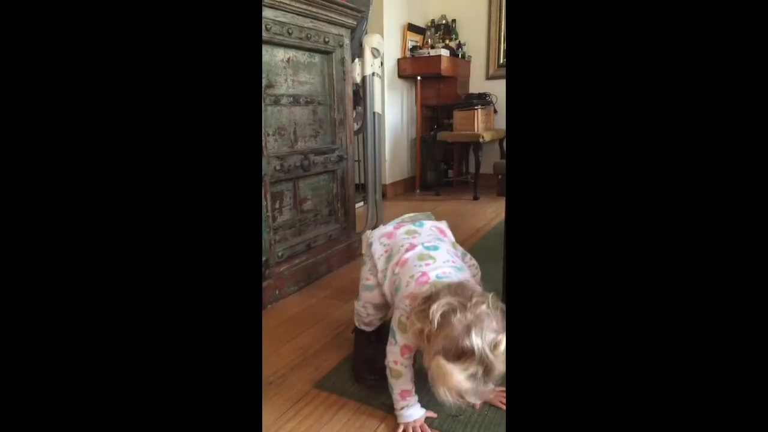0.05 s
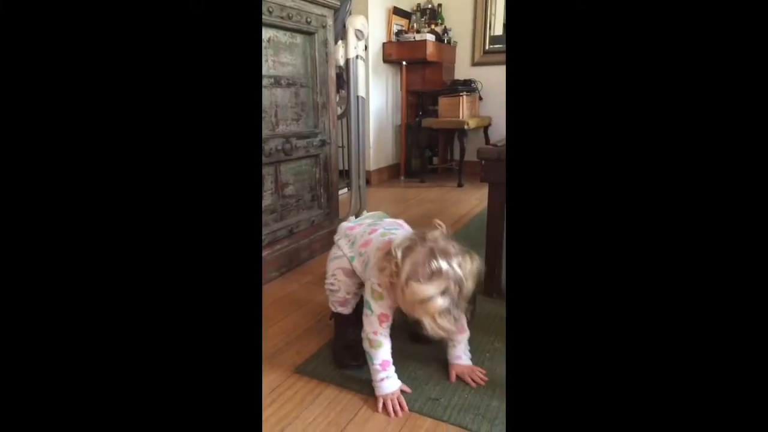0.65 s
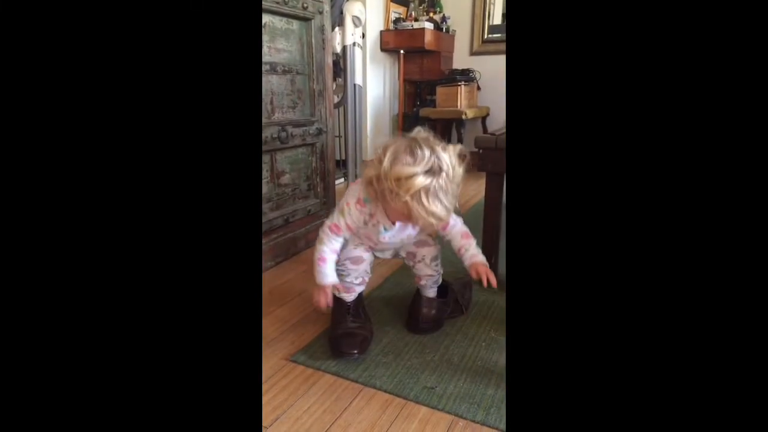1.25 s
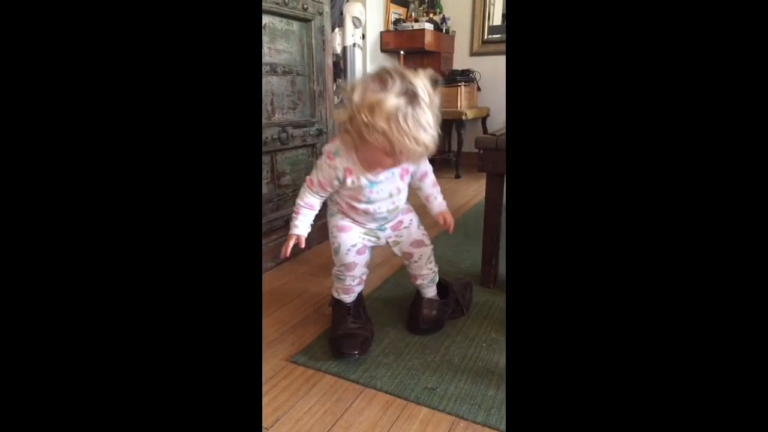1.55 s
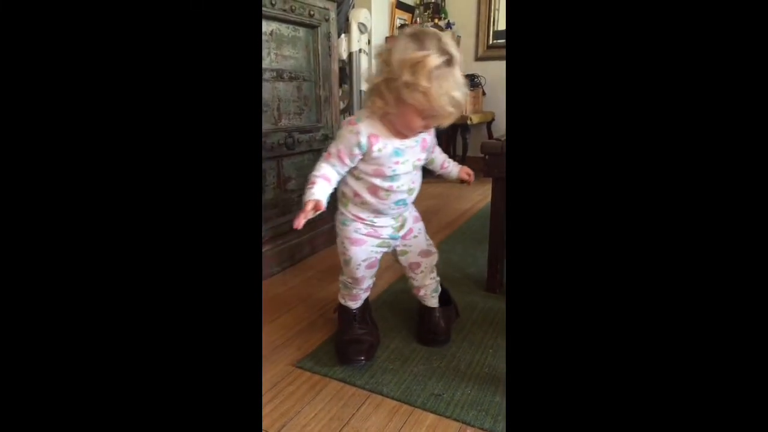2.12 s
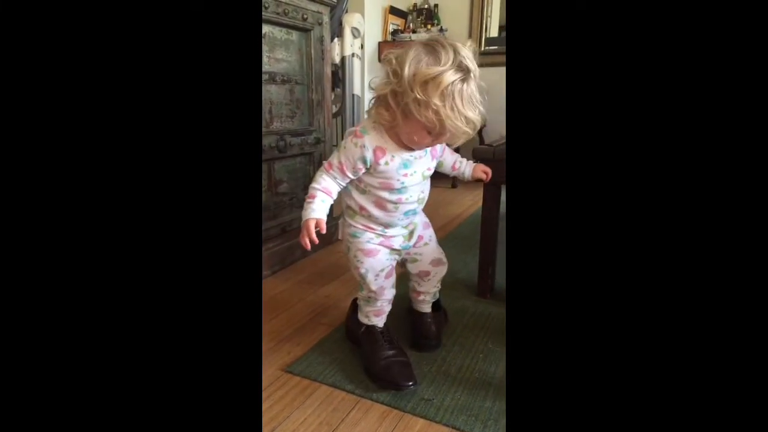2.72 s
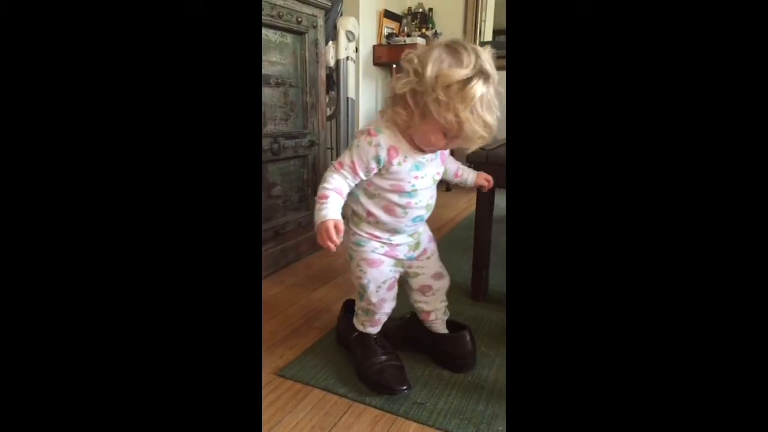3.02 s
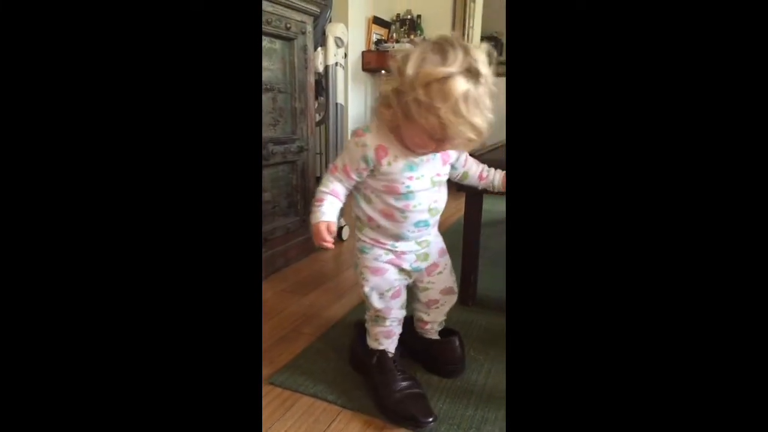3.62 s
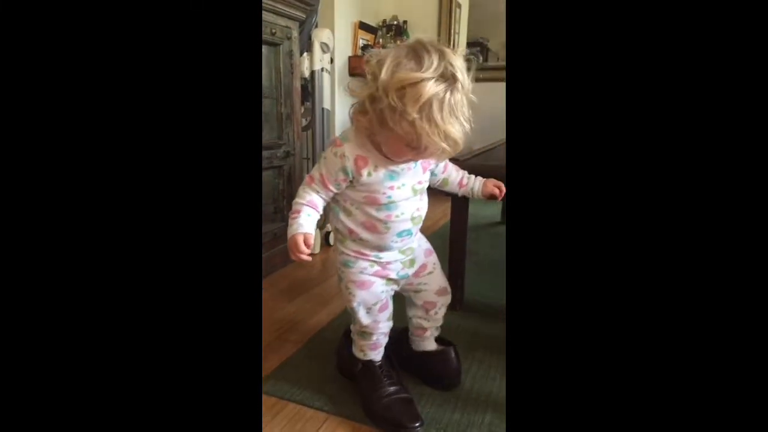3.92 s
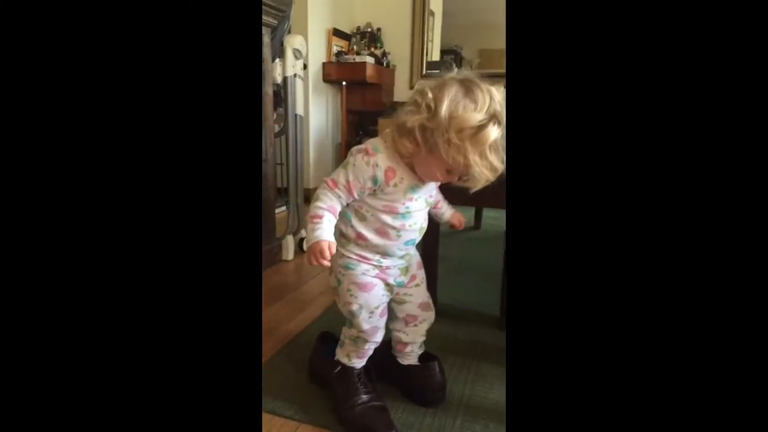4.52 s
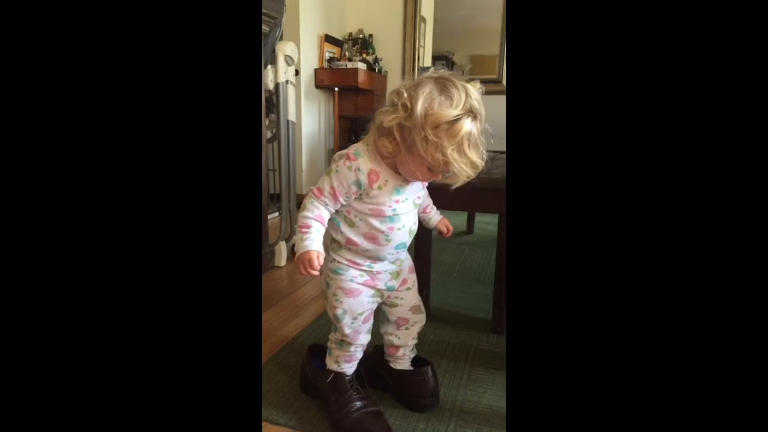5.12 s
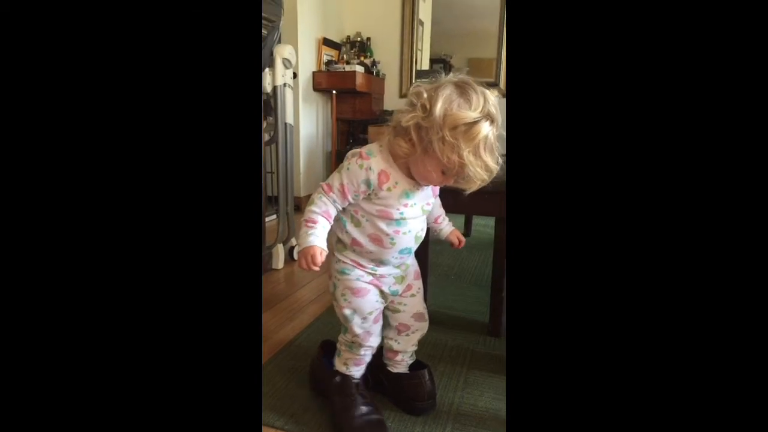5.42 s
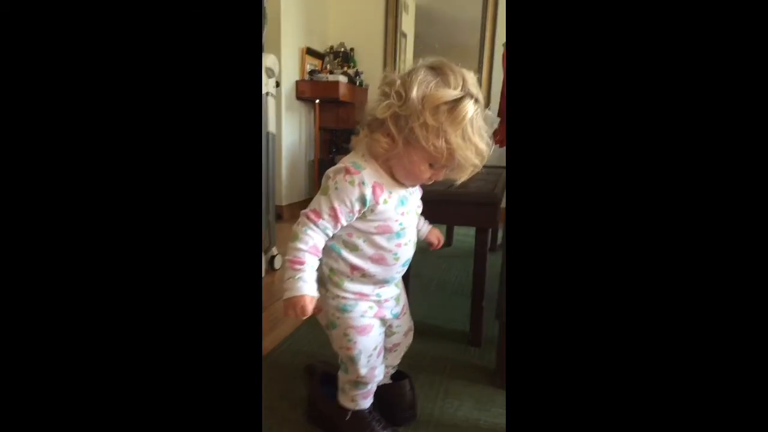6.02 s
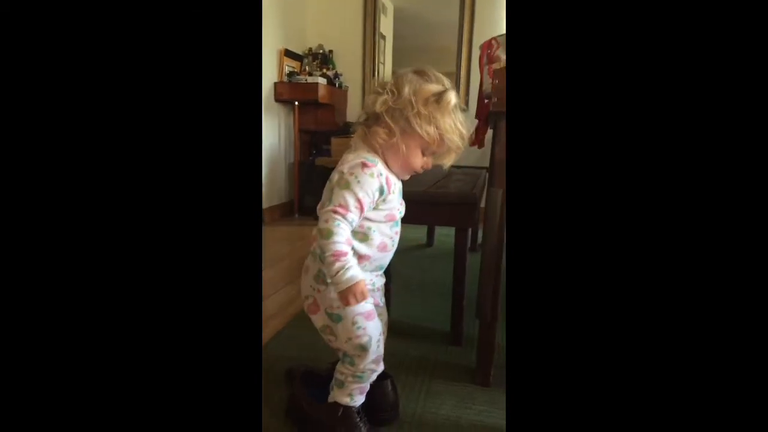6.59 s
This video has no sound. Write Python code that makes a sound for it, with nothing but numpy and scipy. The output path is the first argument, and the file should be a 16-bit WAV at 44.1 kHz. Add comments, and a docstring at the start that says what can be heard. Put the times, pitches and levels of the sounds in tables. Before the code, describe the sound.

In a quiet room, a toddler shuffles in oversized leather shoes on a rug over wooden boards. Faint rustling and scuffing lead to a soft thud, then two louder hollow steps, the second with a heel clack and a boom from the floor. Light scuffs and a softer step follow, and something hard is bumped at the end. The microphone is nearby, with low air noise underneath.

```python
"""A quiet room with a rug over a wooden floor: a toddler stands up and shuffles in large leather shoes.
Each footfall is an impact that excites damped modes: the boards boom, the hollow shoe knocks, the heel
clacks. Between steps, stick-slip friction makes the soles scuff over the pile and the pyjamas rustle.
Leather creases tick, a faint tone follows the last heavy step, and at the end something hard is bumped
and rings. Impacts and rubbing reverberate over steady air noise."""
import sys
import numpy as np
from scipy import signal
from scipy.fft import rfft, irfft
from scipy.io import wavfile
from scipy.ndimage import uniform_filter1d

SR = 44100
rng = np.random.default_rng(int(sys.argv[2]) if len(sys.argv) > 2 else 0)


def wav_record(signal):
    """Record a signal, one row per channel, as 16-bit PCM in the file named by sys.argv[1]."""
    frames = np.transpose(np.atleast_2d(signal))
    bounded = np.clip(frames, -1, 1)
    # unit amplitude maps onto the largest positive 16-bit level
    quanta = np.round(bounded * 32767).astype(np.int16)
    wavfile.write(sys.argv[1], SR, quanta)


N = 297675

# Footfalls: (time [s], hollow knock [dB], heel clack [dB], leather tick [dB], shoe pitch [ratio],
# wait until the weight lands [s], floor boom [dB], skid [dB], skid hold [s], skid resonance [Hz])
STEPS = [ (0.013, -49, -45, -48.5, 1.11, 0.0064, -65, -61, 0.0043, 1210),
         (2.4182, -44, -56, -33, 0.93, .004, -34, -59.5, .04, 3230),
         (2.9500, -17, -48, -28.5, 1.033, 0.054, -34, -57, 0.019, 3560),
         (3.4753, -15, -16, -27, 0.97, 0.003895, -23.5, -54.5, 0.019, 1780),
         (5.4859, -37, -51, -51, 1.03, 0.00273, -50.5, -61.5, 0.012, 716),
         (5.553, -67, -61, -64, 0.79, .002, -40, -56, 0.025, 3600), ]
# Nudges of a shoe that stays on the rug: (time [s], hollow knock [dB], floor boom [dB])
NUDGES = [(1.004, -54.5, -67), (1.784, -57, -65), (2.2735, -51, -78), (2.555, -54, -47.5),
          (2.741, -51, -84), (3.886, -48, -58), (4.007, -48.5, -53.5), (4.076, -51, -72), (4.618, -63, -49),
          (5.239, -52.5, -69), (5.357, -51, -75), (5.52, -45, -71), (5.584, -67, -40), (5.761, -59, -51.5),
          (6.014, -54.5, -62), (6.194, -52.5, -57), (6.298, -69, -52), (6.601, -46.5, -50)]
# Modes of the floorboards: (frequency [Hz], level [dB], T60 [s])
BOARD_MODES = [(49.83, -12, 0.23), (69.8, -15.5, 0.65), (96.5, 5, 0.055), (107.8, -3, 0.12),
               (118.8, -6.5, 0.12), (177.3, -3.5, 0.034), (179, 1.5, 0.059), (222, -23, 0.32)]
def footfalls(rebound_s=.014, rock_s=.078, dulling_db_per_s=371):
    """Impact excitation: a shoe strikes and rebounds, the weight drives the boards, the shoe rocks."""
    out, boom = np.zeros(N), struck(BOARD_MODES, contact_s=.0053)
    light_touches = list(NUDGES)
    for s, knock_db, clack_db, tick_db, pitch, wait, boom_db, *_ in STEPS:
        add(out, s, shoe(knock_db, clack_db, tick_db, pitch))
        # the sole slaps flat under the weight, duller the later it lands
        lands = s + wait
        edge_db = -4.5 - dulling_db_per_s * wait
        add(out, lands, shoe(boom_db - 6, clack_db + edge_db, tick_db + edge_db, pitch * .881))
        add(out, lands + .001, amp(boom_db) * boom)
        rebound_db = min(knock_db - 1.5, -49.5)
        rock_db = min(boom_db - 10.5, -46)
        light_touches.append((s + rebound_s, rebound_db, min(rebound_db, rock_db)))
        light_touches.append((lands + rock_s, rock_db - 6, rock_db))
    for s, knock_db, boom_db in light_touches:
        add(out, s, shoe(knock_db, clack_db=knock_db - 14, tick_db=knock_db - 19, pitch=.95))
        add(out, s + .00033, amp(boom_db) * boom)
    return out


# Modes of the shoe's cavity, heel and leather: (frequency [Hz], level [dB], T60 [s])
CAVITY_MODES = [(352, -15.5, 0.026), (413, -1, 0.024), (484.6, 4.5, 0.017), (546.3, -7, 0.025),
                (605.4, -7, 0.023), (726, -4, 0.016), (850, -30.5, 0.066)]
HEEL_MODES = [(770, -30, 0.017), (993, -0.5, 0.026), (1170, 12.5, 0.013), (1372, -1, 0.025),
              (1690, -5.5, 0.0063)]
LEATHER_MODES = [(1536, 3, 0.0064), (2136, 1, 0.0058), (2915, -1.5, 0.0062), (3860, -7, 0.0072),
                 (4400, -9, 0.0046), (7800, -18, 0.0026)]
def shoe(knock_db, clack_db, tick_db, pitch):
    """Superposition of three resonators: the leather touches first, then cavity and heel ring."""
    cushion_s = np.interp(knock_db, [-52, -42], [.005, .0014])  # the pile softens light touches
    blow = amp(tick_db) * struck(LEATHER_MODES, .00033, pitch)
    add(blow, .00036, amp(knock_db) * struck(CAVITY_MODES, cushion_s, pitch))
    add(blow, .00049, amp(clack_db) * struck(HEEL_MODES, .00054, pitch))
    return blow


# Short rubs, of soles dragging over the rug and a few faint brushes of pyjama cloth:
# (start [s], duration [s], rasp [dB], hiss [dB], resonance [Hz])
RUBS = [ (0.0, 0.19, -71, -71, 1190), (0.578, 0.39, -69.5, -64.5, 1483), (1.36, 0.078, -68, -76, 2190),
        (1.578, 0.057, -64, -80, 1280), (1.759, 0.14, -68, -82, 2120), (1.956, 0.064, -70.5, -92, 1250),
        (2.282, 0.065, -58, -73, 2080), (2.315, 0.1, -59, -72, 1830), (2.721, 0.079, -63, -73, 1630),
        (2.797, 0.15, -55, -58.5, 1520), (2.899, 0.082, -61.5, -68, 2400),
        (3.303, 0.21, -66.5, -71.5, 2320), (3.801, 0.38, -66.5, -70, 1760),
        (3.962, 0.16, -67.5, -72.5, 2170), (4.513, 0.17, -63.5, -75, 2280),
        (4.578, 0.063, -68.5, -78, 3500), (5.386, 0.2, -62.5, -68, 2310), (6.041, 0.061, -62, -73, 2680),
        (6.59, 0.22, -59, -70, 2340), ]
# Friction spectra of rasp and hiss: (frequency [Hz], relative level [dB])
RASP_SPECTRUM = [(200, -36), (480, 6.5), (750, -10), (1100, -4), (1500, -2), (2300, -2.5), (3000, -8.5),
                 (3700, -6), (4600, -9.5), (8000, -21), (15000, -38)]
HISS_SPECTRUM = [(800, -25), (2500, -2), (4500, -3.5), (6500, -1.5), (8800, -1.5), (10500, -6),
                 (12000, -5.5), (15300, -12.5)]
def rubs_and_skids(resonance_db=4, swell_share=.31, skid_rise_s=.0016, skid_fall_s=.05):
    """Sliding friction: a resonant rasp and a fine hiss; rubs swell and fade, skids start at once."""
    coarse = colour(friction(slips_per_s=1100, spread_db=2.5, smooth=1, clump_db=1), RASP_SPECTRUM)
    hiss = colour(friction(slips_per_s=8800, spread_db=2, smooth=1, clump_db=2), HISS_SPECTRUM)
    strokes = [(s, length * swell_share, 0, length * (1 - swell_share), *sound)
               for s, length, *sound in RUBS]
    for s, *_, skid_db, hold, hz in STEPS:  # every footfall skids a little
        hiss_db = skid_db - 3 - 6 * np.log2(3470 / hz)  # 6 dB less hiss for each octave lower
        strokes.append((s, skid_rise_s, hold, skid_fall_s, skid_db, hiss_db, hz))
    t, out = np.arange(N) / SR, np.zeros(N)
    for s, rise, hold, fall, rasp_db, hiss_db, hz in strokes:
        corners = np.cumsum([s, rise, hold, fall])
        span = (t >= s) & (t < corners[-1])
        envelope = np.sin(np.pi / 2 * np.interp(t[span], corners, [0, 1, 1, 0])) ** 1.82
        ringing = signal.lfilter(*signal.iirpeak(hz, Q=7, fs=SR), coarse[span])
        rasp = unit(coarse[span] + amp(resonance_db) * ringing)
        out[span] += envelope * (amp(rasp_db) * rasp + amp(hiss_db) * hiss[span])
    return out


# Impacts on a hard object: (time [s], peak level [dB])
BUMPS = [(6.645, -41.5), (6.659, -42.5), (6.6622, -29.5), (6.704, -45)]
# Its modes: (frequency [Hz], level [dB], T60 [s])
OBJECT_MODES = [(400, -2, 0.036), (501, 9, 0.053), (649, -6.5, 0.046), (780, -43, 0.061),
                (1205, -11.5, 0.064), (2170, -23, 0.062), (2400, -18, .06), (2870, -10, 0.015),
                (3500, -2, 0.019), (3840, -9, 0.047), (4020, 1, 0.022), (4300, -8, 0.02),
                (5180, -7.5, 0.028), (6700, -20, 0.03)]
def bumped_object():
    """Free vibration: a rattling bump leaves a low woody note and bright partials ringing."""
    out, ring = np.zeros(N), struck(OBJECT_MODES, contact_s=.0011)
    for s, db in BUMPS:
        add(out, s, amp(db) * ring)
    return out


# Snaps of the leather: (time [s], high crackle peak [dB], its frequency [Hz], low crackle peak [dB])
SNAPS = [(2.068, -60, 11060, -72), (2.296, -69, 4670, -49), (2.709, -61, 5080, -51), (2.9, -49, 6800, -64),
         (5.24, -57.5, 10230, -56.5), (6.054, -60, 6600, -53), (6.594, -55, 5330, -66)]
def leather_snaps(t60=.02, spread=.146, low_ratio=.39):
    """Sudden release of strain: a crease lets go and two narrow clusters of partials ring briefly."""
    t, out = np.arange(SR // 20) / SR, np.zeros(N)
    for s, high_db, high_hz, low_db in SNAPS:
        for db, hz in (high_db, high_hz), (low_db, high_hz * low_ratio):
            partials_hz = hz * (1 + spread * rng.uniform(-1.45, 1, size=(8, 1)))
            cycles = partials_hz * t + rng.random(size=(8, 1))
            snap = np.sin(2 * np.pi * cycles).sum(0) * decay(t, t60)
            add(out, s, amp(db) * snap / abs(snap).max())
    return out


# Rustle of the pyjamas as the child moves: (time [s], level [dB])
CLOTH_LEVELS = [(0, -79.5), (.5, -74), (1.25, -75), (1.8, -71), (2.25, -72), (2.6, -76), (5.1, -80),
                (5.9, -77.5), (6.75, -77.5)]
# Friction spectrum of cotton: (frequency [Hz], relative level [dB])
CLOTH_SPECTRUM = [(300, -11), (1200, 0), (2200, -4.5), (4000, -7), (8000, -9.5), (15000, -14)]
def pyjamas():
    """Fibre friction: soft cotton rubs, giving broadband noise with small crackles."""
    rub = friction(slips_per_s=700, spread_db=2, smooth=1.9, clump_db=1)
    return level(CLOTH_LEVELS) * colour(rub, CLOTH_SPECTRUM)


# A faint ring after the last heavy step: (time [s], level [dB])
RING_LEVELS = [(5.55, -92), (5.70, -78.5), (5.85, -78.5), (6.05, -82), (6.35, -92)]
def thin_ring(hz=2080, flutter_hz=22):
    """Random amplitude modulation: one thin tone wavers and spreads into a narrow band."""
    flutter = 1 + .41 * wander(flutter_hz)
    return level(RING_LEVELS) * unit(flutter * np.sin(2 * np.pi * hz * np.arange(N) / SR))


# Spectrum of the room's air noise: (frequency [Hz], relative level [dB])
AIR_SPECTRUM = [(15, -51), (25, -12), (59, -7.5), (147, -1.5), (178, -7.5), (215, -1), (246, -9.5),
                (368, -3.5), (495, -12.5), (847, -13), (995, -20.5), (1620, -19), (2920, -24), (8790, -31),
                (15500, -37)]
# Peaks and dips in its hum: (centre [Hz], width [Hz], gain [dB])
HUM_BANDS = [(51.3, 25.5, 7), (121, 7.9, 5), (210, 29, 3.5), (256, 10, -4), (421, 125, 3.5),
             (10600, 280, -18.5)]
def room_tone(level_db=-64.5):
    """Stationary noise: steady air, lifted at the room's resonances and notched in two bands."""
    hz = np.fft.rfftfreq(N, 1 / SR)
    lift_db = sum(db * np.exp(-((hz - centre) / width) ** 2) for centre, width, db in HUM_BANDS)
    hum = irfft(rfft(rng.standard_normal(N)) * amp(lift_db), N)
    return amp(level_db) * colour(hum, AIR_SPECTRUM)


# Reverberation time: (frequency [Hz], T60 [s])
ROOM_T60 = [(60, 0.52), (150, 0.57), (400, 0.31), (700, 0.34), (1000, 0.39), (2500, 0.32), (6000, 0.65),
            (14000, 0.21)]
# Spectrum of the diffuse tail: (frequency [Hz], relative level [dB])
TAIL_SPECTRUM = [(50, 3), (120, -7), (220, 3.5), (300, -2), (480, -3.5), (700, 2), (1000, 1), (1400, -5.5),
                 (2200, -4), (5000, -8.5), (14000, -14)]
# Early reflections: (delay [s], gain [ratio])
ECHOES = [(.0045, 0.22), (0.013, 0.14), (0.0197, 0.14), (.0365, 0.06)]
def room(x, wet_db, build_s=.0056):
    """Reverberation by convolution: direct sound, wall echoes and a tail decaying band by band."""
    size = SR * 3 // 4
    hz, t, bands = signal.stft(rng.standard_normal(size), SR, nperseg=256)
    bands = bands * decay(t, read(ROOM_T60, hz)[:, None])
    onset = np.minimum(np.arange(size) / SR / build_s, 1) ** 2
    tail = onset * signal.istft(bands, SR, nperseg=256)[1][:size]
    # flatten the noise tail's chance peaks so the reverberation sounds smooth
    spectrum = rfft(tail, 2 * size)
    local_power = abs(uniform_filter1d(abs(spectrum) ** 2, size=110))
    spectrum /= np.sqrt(local_power + 1e-12)
    tail_db = wet_db + read(TAIL_SPECTRUM, np.fft.rfftfreq(2 * size, 1 / SR))
    response = irfft(spectrum * amp(tail_db))[:size]
    response[0] += 1  # direct sound
    for delay, gain in ECHOES:
        response[round(delay * SR)] += gain
    return signal.fftconvolve(x, response)[:N]


def struck(modes, contact_s, pitch=1):
    """Modal synthesis: damped sines with a joint peak of one; longer contact softens the attack."""
    t = np.arange(SR // 3) / SR
    hz, db, t60 = np.transpose(modes)[:, :, None]
    ring = (amp(db) * decay(t, t60) * np.sin(2 * np.pi * pitch * hz * t)).sum(0)
    attack = 1 - np.exp(-(t / contact_s) ** 2)
    # a body radiates little below its lowest mode
    bass_cut = signal.butter(2, .8 * pitch * hz.min(), "high", fs=SR, output="sos")
    ring = signal.sosfilt(bass_cut, ring * attack)
    return ring / abs(ring).max()


def friction(slips_per_s, spread_db, smooth, clump_db, clump_hz=70):
    """Stick-slip: fibres catch and let go unevenly over a smooth rub, louder as the pressure rises."""
    slipping = rng.random(N) < slips_per_s / SR
    sizes = amp(spread_db * np.minimum(rng.exponential(1, N), 4))
    pressure = np.clip(wander(clump_hz), -2, 2)
    slips = unit(slipping * sizes * rng.standard_normal(N))
    return (slips + smooth * rng.standard_normal(N)) * amp(clump_db * pressure)


def wander(hz):
    """Random fluctuation: low-passed noise with an rms of one."""
    return unit(signal.sosfilt(signal.butter(2, hz, fs=SR, output="sos"), rng.standard_normal(N)))


def decay(t, t60):
    """Exponential damping: 60 dB down after t60 seconds."""
    return np.exp(-np.log(1000) * t / t60)


def colour(x, spectrum):
    """Spectral shaping: filters x by rows of (Hz, dB), to an rms of one."""
    gain = amp(read(spectrum, np.fft.rfftfreq(N, 1 / SR)))
    return unit(irfft(rfft(x) * gain, N))


def level(curve):
    """Amplitude envelope: gain at every sample from rows of (s, dB)."""
    return amp(np.interp(np.arange(N) / SR, *np.transpose(curve)))


def read(points, hz):
    """Interpolation on a logarithmic frequency axis."""
    points_hz, values = np.transpose(points)
    return np.interp(np.log(hz + 1), np.log(points_hz + 1), values)


def amp(db):
    """Decibels to amplitude ratio."""
    return 10 ** (np.asarray(db) / 20)


def unit(x):
    """Normalisation to an rms of one."""
    return x / np.sqrt(np.mean(x ** 2) + 1e-20)


def add(mix, s, sound):
    """Superposition: mixes a sound in at time s."""
    part = mix[max(round(s * SR), 0):][:len(sound)]
    part += sound[:len(part)]


def scene():
    """Linear mixing: reverberant impacts and drier rubbing, over the thin ring and the steady air."""
    impacts = room(footfalls() + bumped_object() + leather_snaps(), wet_db=-4)
    rubbing = room(rubs_and_skids() + pyjamas(), wet_db=-9)
    return (impacts + rubbing + thin_ring() + room_tone())[None]


def record(dry, low_cut_hz=42, high_cut_hz=15400):
    """Band limiting: the microphone rolls off the bass and a steep low-pass removes the top treble."""
    bass_cut = signal.butter(4, low_cut_hz, "high", fs=SR, output="sos")
    treble_cut = signal.firwin(511, high_cut_hz, window=("kaiser", 8), fs=SR)
    return signal.oaconvolve(signal.sosfilt(bass_cut, dry), treble_cut[None], "same")


dry = scene()
out = record(dry)
wav_record(out)
```